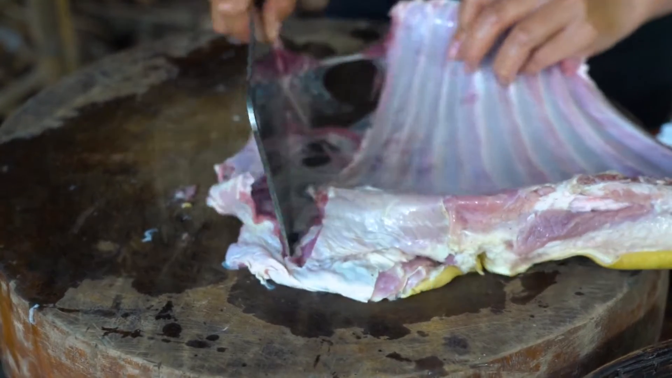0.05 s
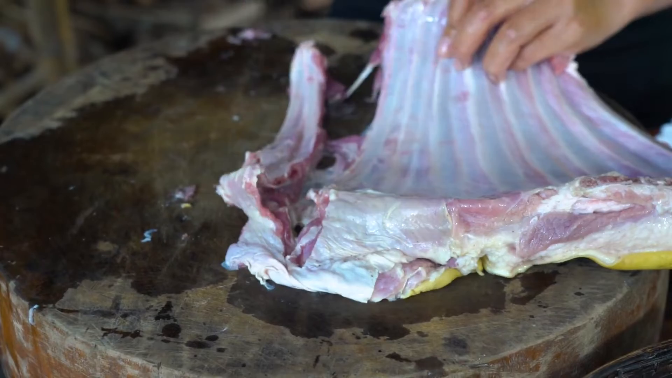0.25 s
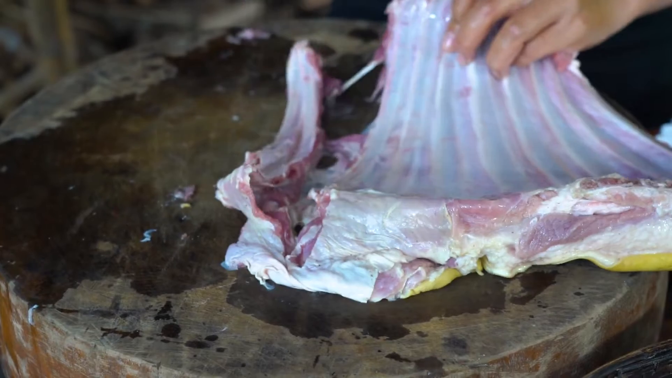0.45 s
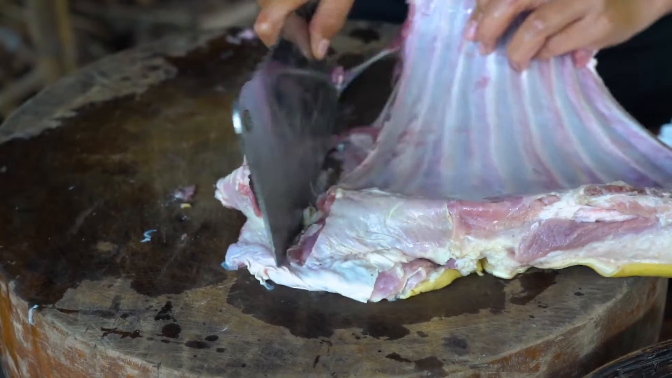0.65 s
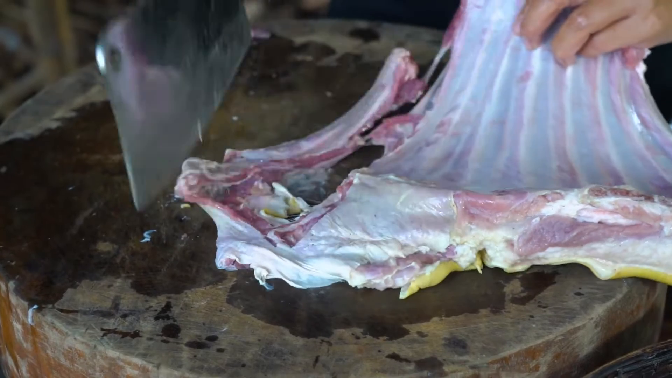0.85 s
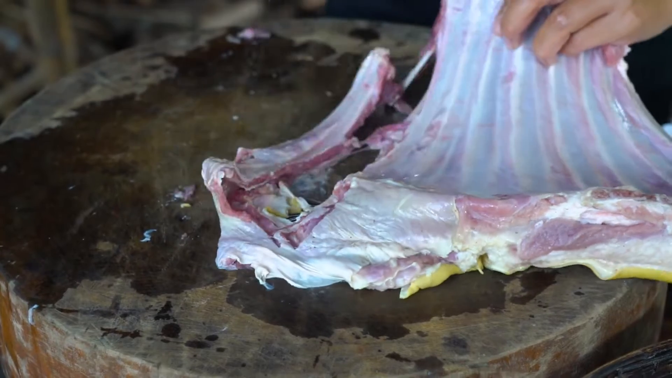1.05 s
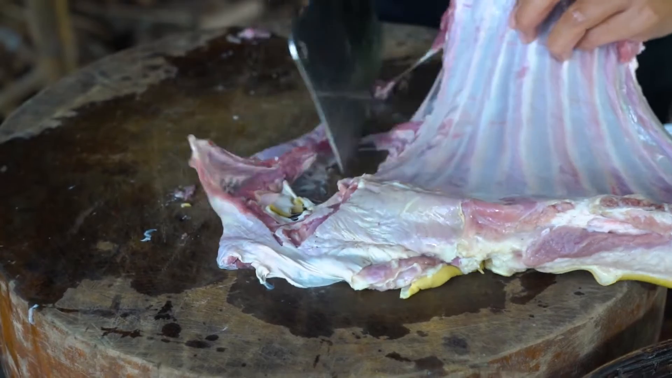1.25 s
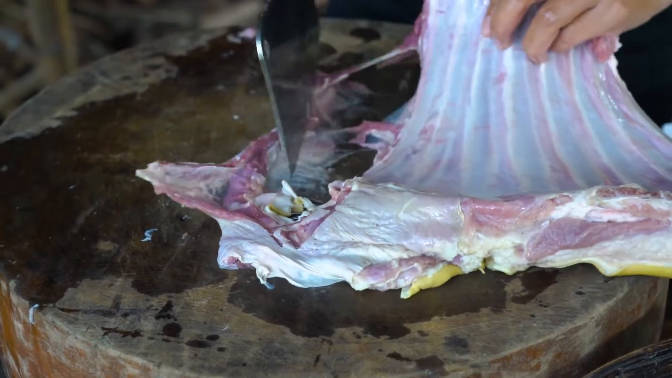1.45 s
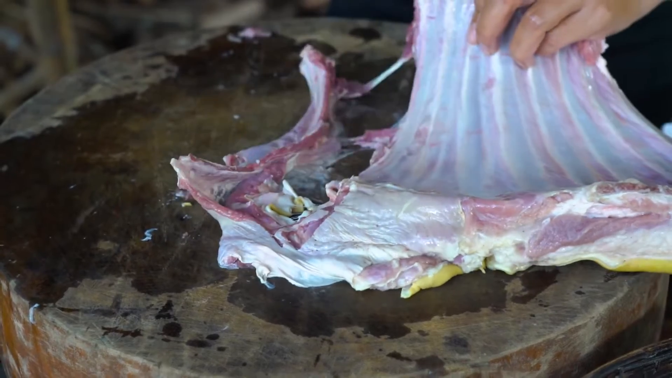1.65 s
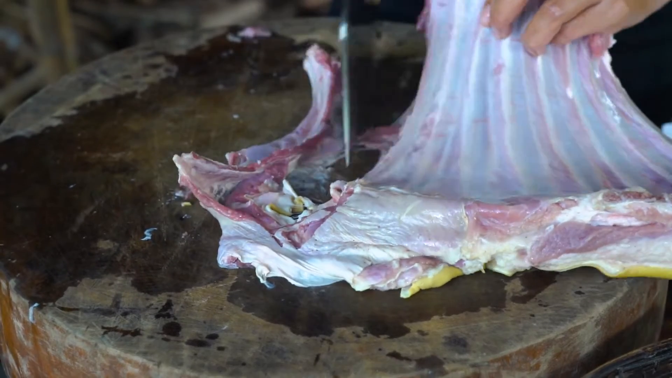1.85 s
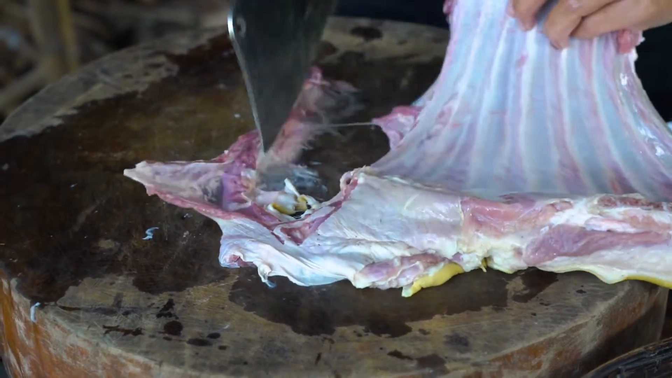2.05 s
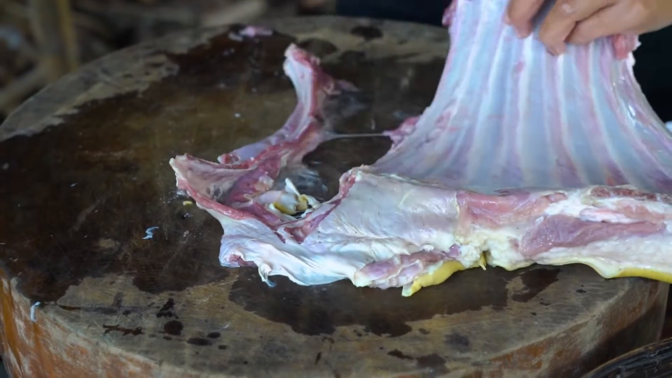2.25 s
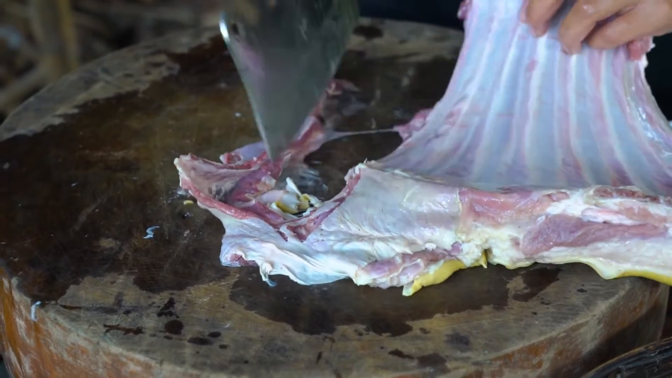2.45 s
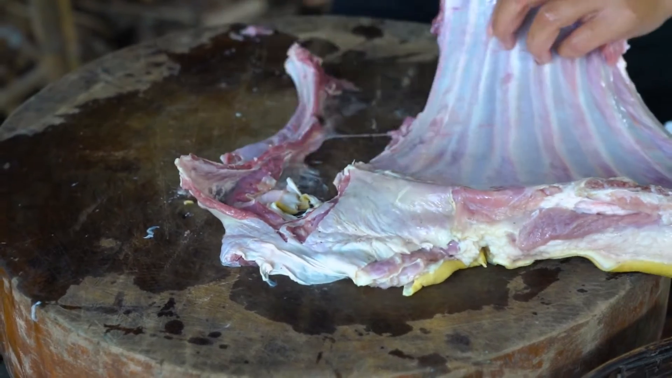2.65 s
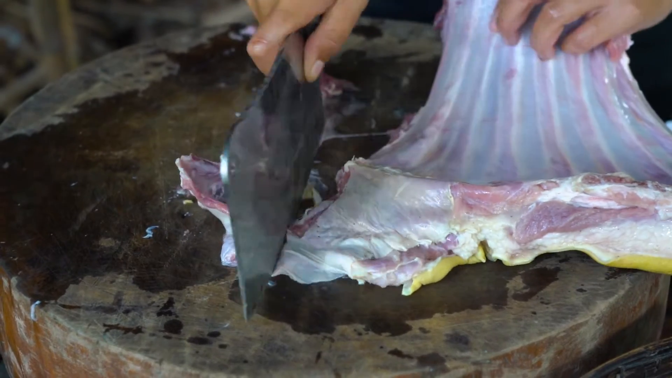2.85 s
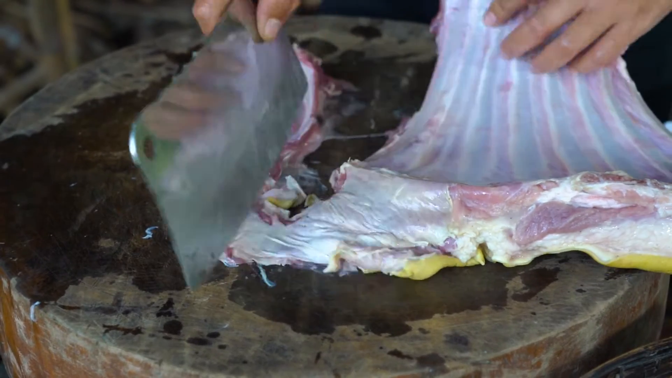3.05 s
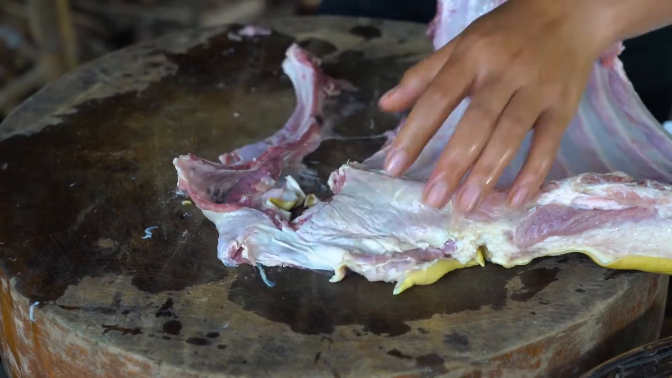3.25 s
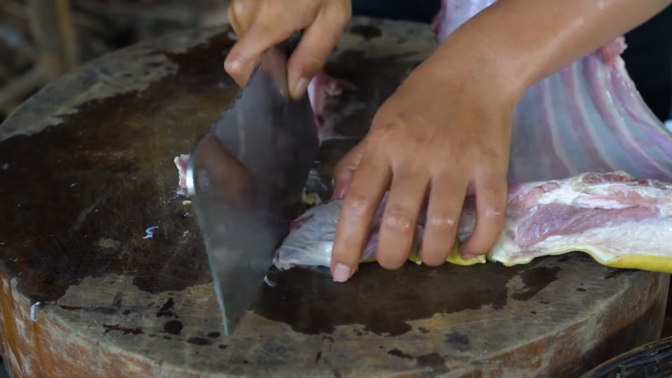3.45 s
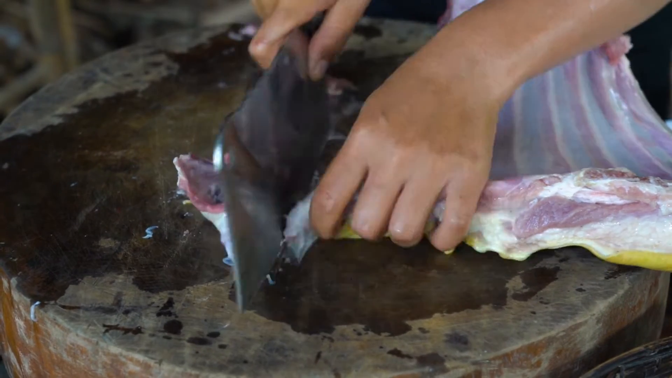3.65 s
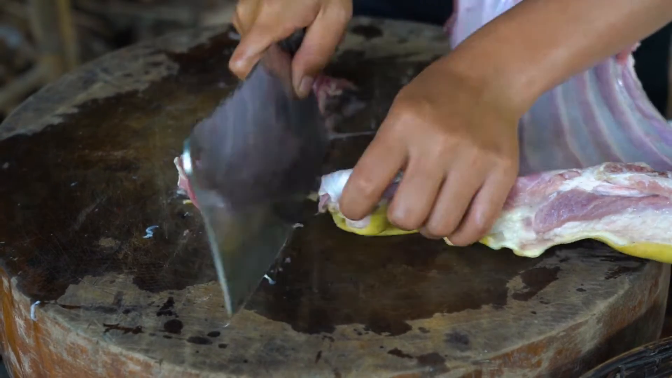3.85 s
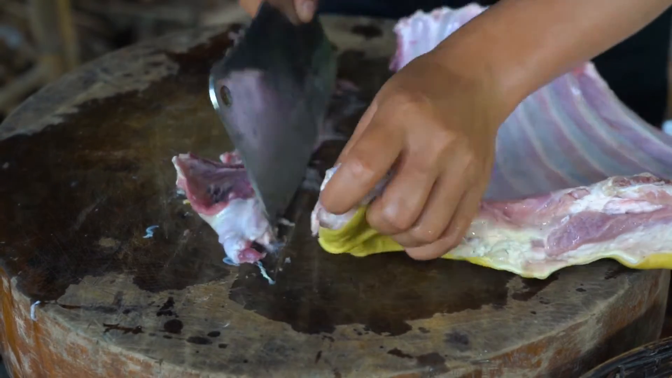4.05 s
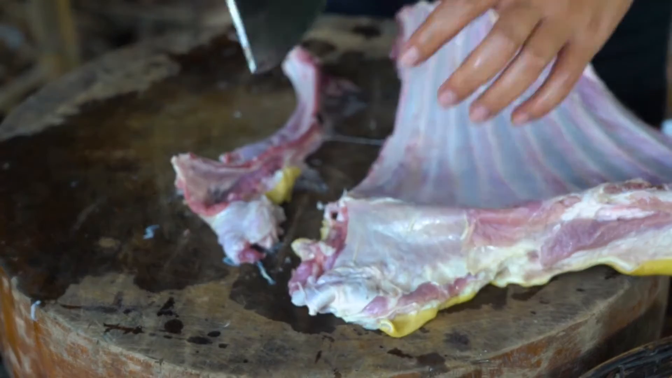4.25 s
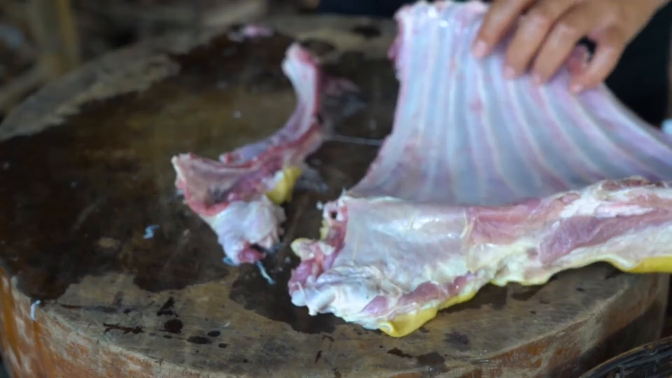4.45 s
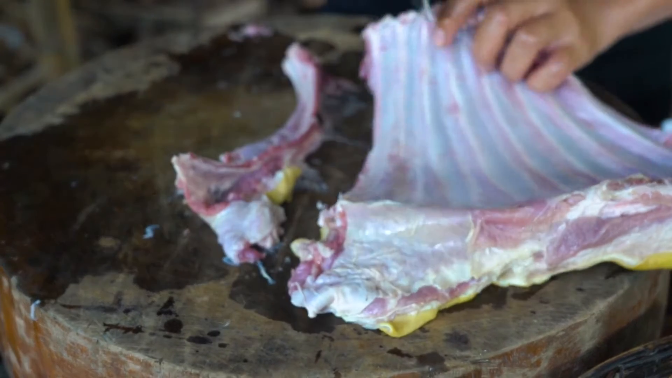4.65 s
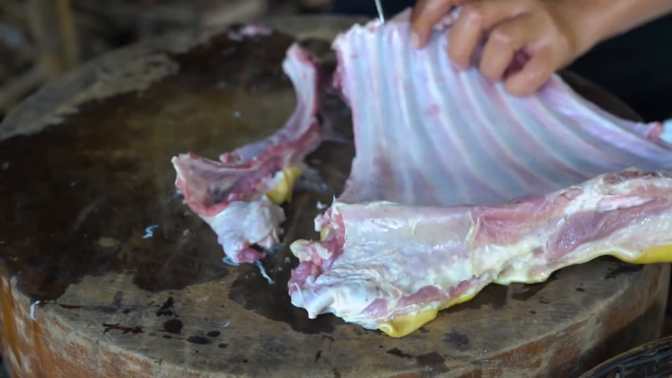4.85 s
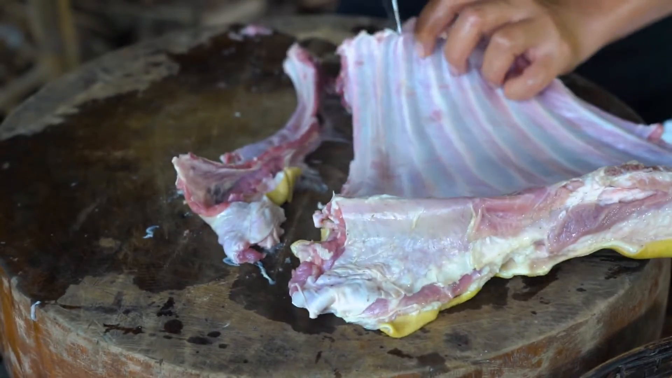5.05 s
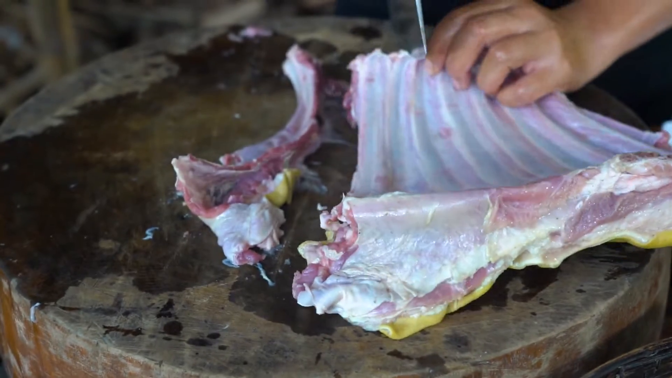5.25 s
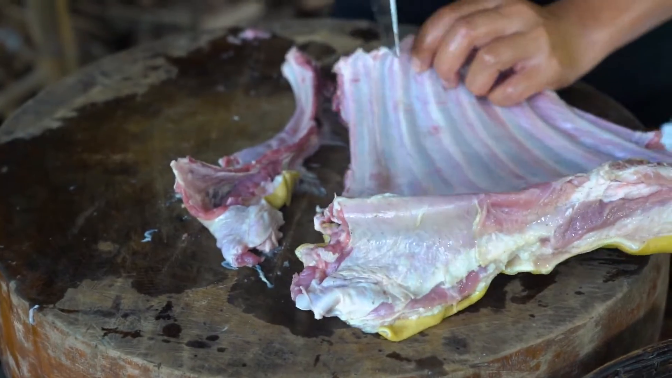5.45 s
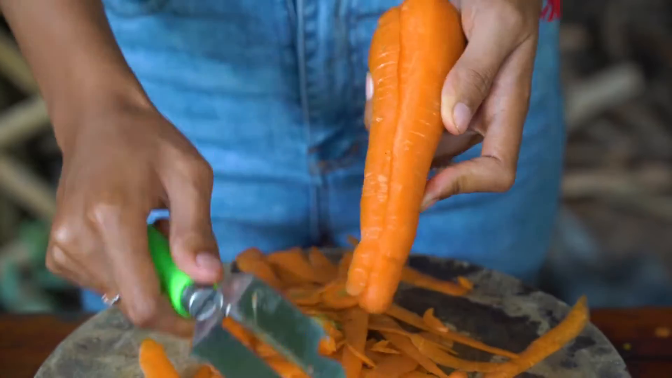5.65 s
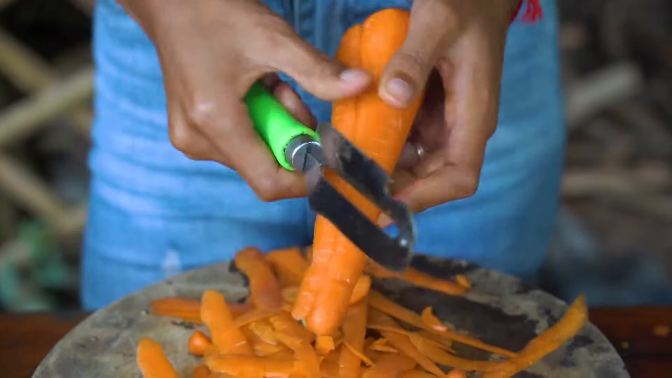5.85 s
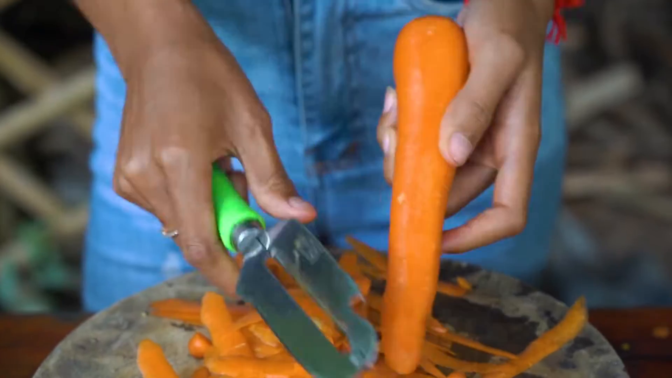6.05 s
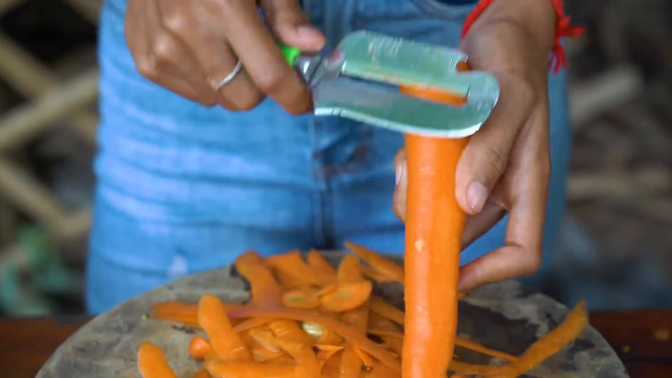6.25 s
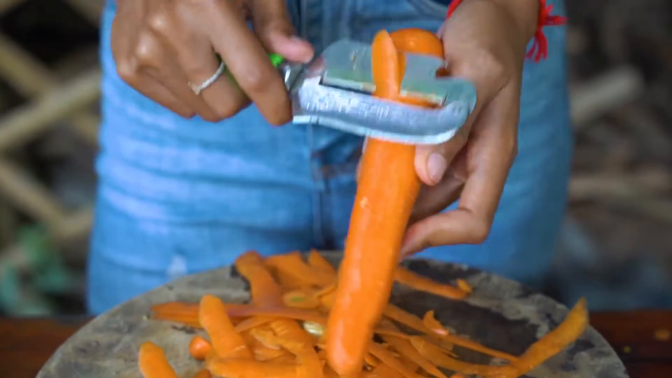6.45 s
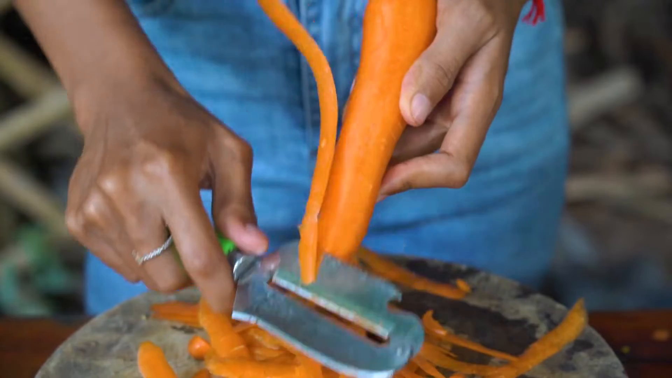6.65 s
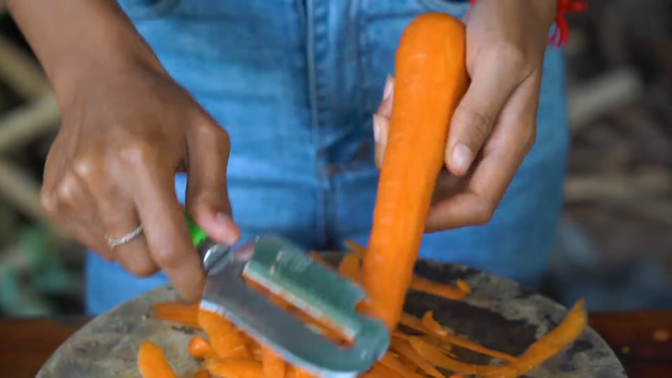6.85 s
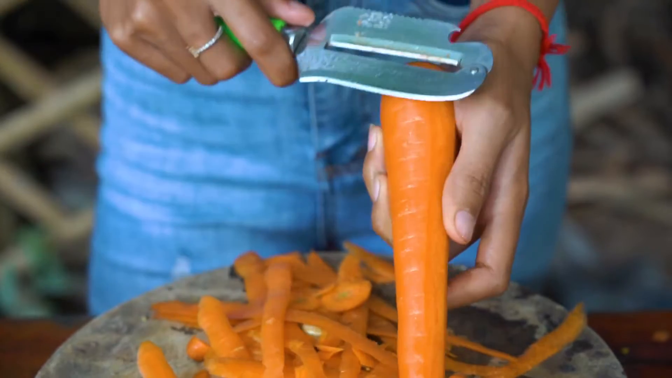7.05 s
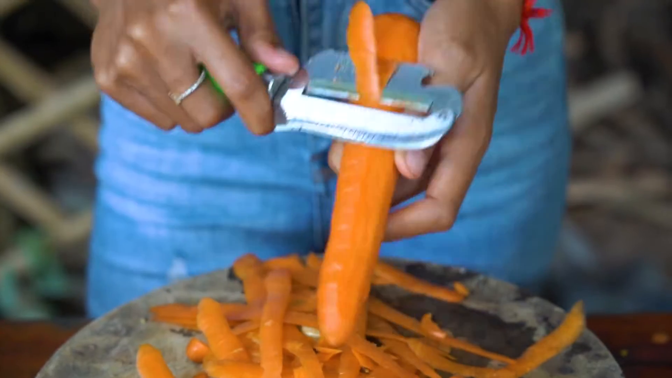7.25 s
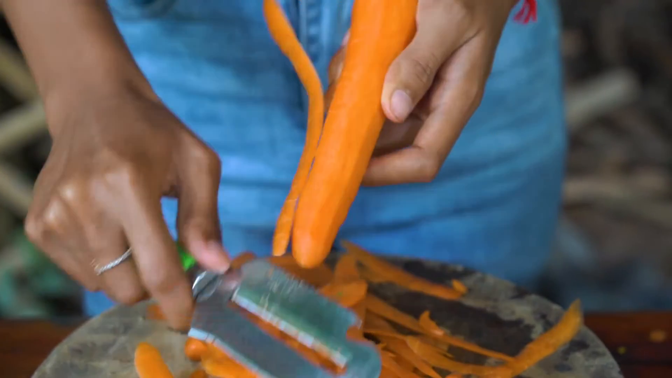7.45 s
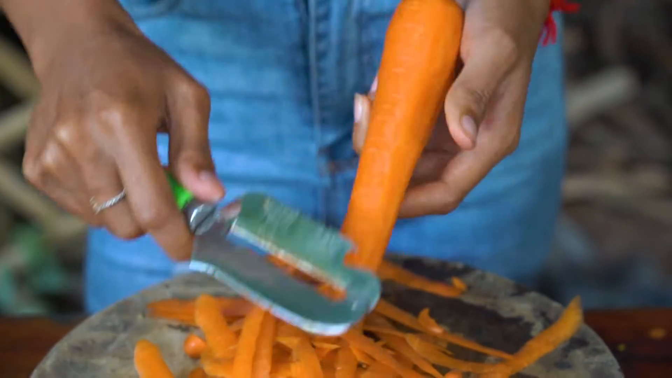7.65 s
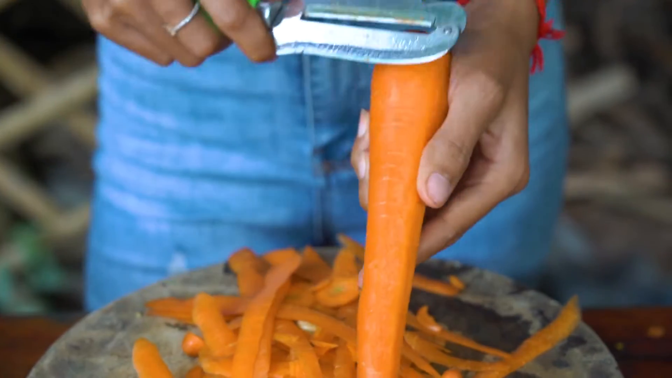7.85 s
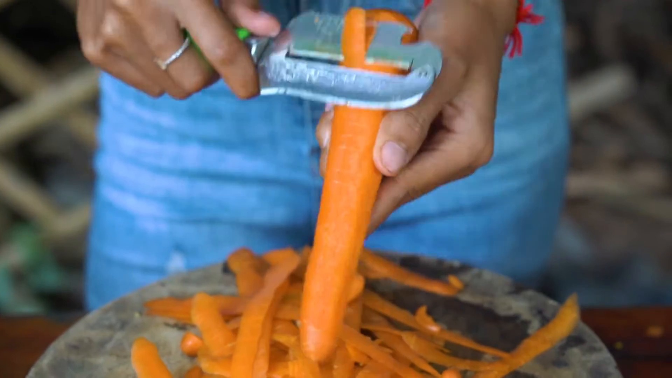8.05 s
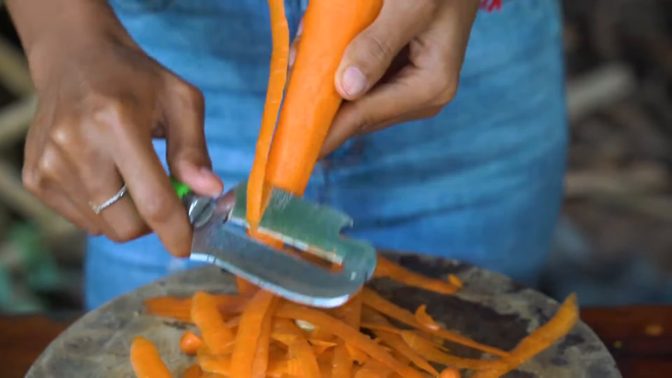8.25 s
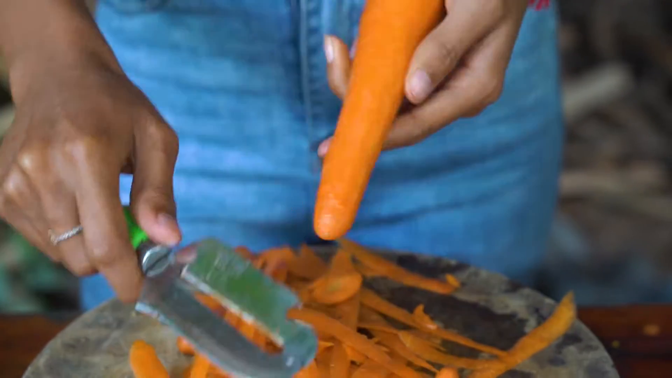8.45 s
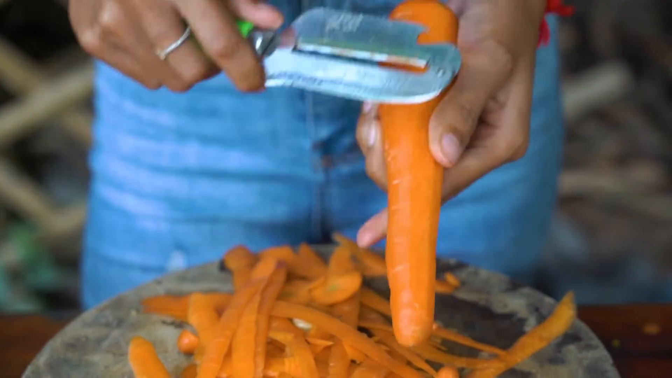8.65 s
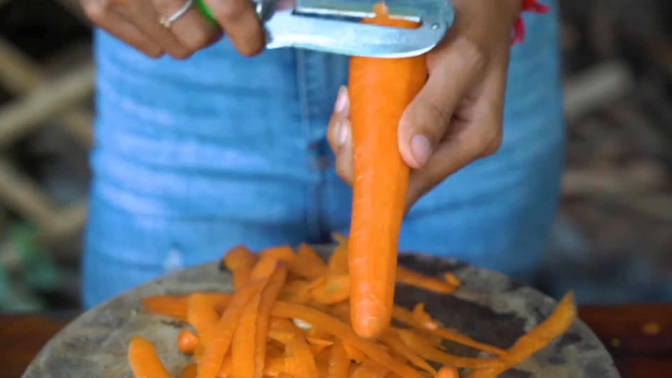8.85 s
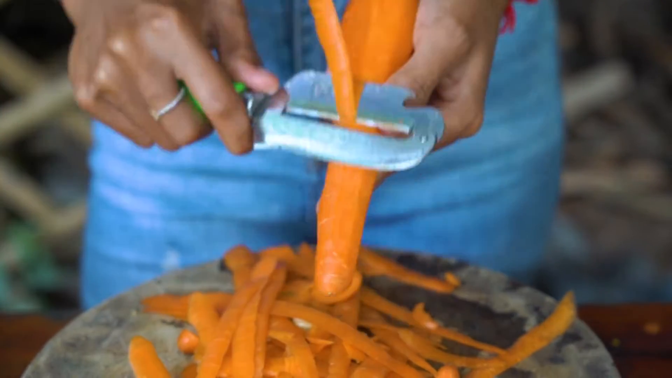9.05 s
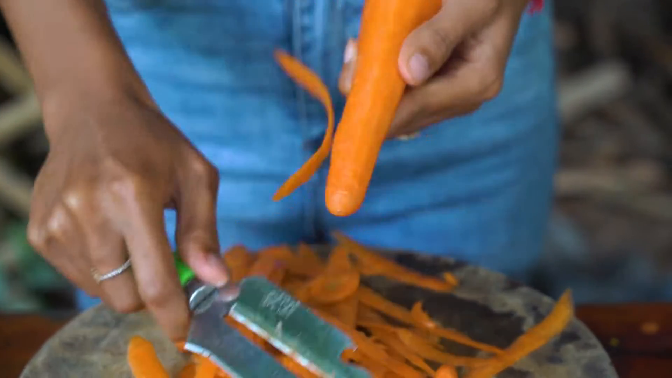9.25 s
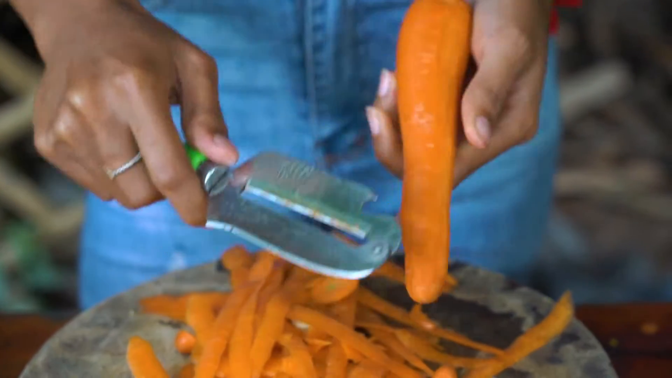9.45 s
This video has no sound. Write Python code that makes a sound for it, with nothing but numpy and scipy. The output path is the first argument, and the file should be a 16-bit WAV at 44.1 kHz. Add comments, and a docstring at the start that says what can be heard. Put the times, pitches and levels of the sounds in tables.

```python
"""Faint outdoor air and hiss lie under everything; from the start meat is dragged over wood in sticky noise.
A heavy cleaver then chops ribs on a thick block in a yard: crackling noise for bone and wood, decaying
sines for block and steel, low sines for its heave, delayed noise for the walls. Taps and thuds fall between.
Thin chirps, then distant calls, are wavering sines. From 5.64 s the direction changes; dull rumbles come in,
then a peeler scrapes in bright noise between the last chops."""
import sys
import numpy as np
from scipy import signal
from scipy.fft import rfft, irfft
from scipy.io import wavfile
from scipy.ndimage import uniform_filter1d, minimum_filter1d

SR = 44100
rng = np.random.default_rng(int(sys.argv[2]) if len(sys.argv) > 2 else 0)


def to_wav(sig):
    """Store sig (one row per channel, or 1-D mono) as 16-bit WAV at the path in sys.argv[1].

    Samples outside -1..1 are clipped; the rate is SR.
    """
    pcm = np.clip(np.atleast_2d(sig), -1, 1) * 32767
    pcm = np.round(pcm).astype(np.int16)
    wavfile.write(sys.argv[1], SR, pcm.T)  # frames by channels


N = 418950
TIME = np.arange(N) / SR  # seconds through the scene
AGE = np.arange(20480) / SR  # seconds since the start of one event

# Direction: left lead in seconds, treble left minus right in dB for near sound, the same for far sound
FIRST_SPOT, SECOND_SPOT = (0.00009, -5.5, 0.43), (-0.00011, -7, -7)
MOVE_S = 5.64  # events from here on use the second spot


def undb(db):
    """Decibels to gain."""
    return 10 ** (np.asarray(db) / 20)


def unit(x):
    """Scale to rms 1."""
    return x / np.sqrt(np.mean(x ** 2))


def fade(t60, delay=0):
    """Exponential decay by 60 dB in t60 seconds, silent until the delay is over."""
    return (AGE >= delay) * np.exp(-np.log(1000) * np.maximum(AGE - delay, 0) / t60)


def swell(length, edge=0.019):
    """A gate of the given length in seconds with straight ramps at both edges."""
    return np.clip(np.minimum(AGE, length - AGE) / edge, 0, 1)


def wander(size, rate):
    """Smooth chance of spread near 1: random knots, rate of them per SR points, joined by lines."""
    knots = rng.standard_normal(4096)
    return 1.11 * np.interp(np.arange(size) / SR * rate, np.arange(len(knots)), knots)


def freqs(x):
    """Frequencies of the bins of x in Hz, kept off zero."""
    return np.maximum(np.fft.rfftfreq(x.shape[-1], 1 / SR), 1)


def grains(spread_db=0, channels=3, size=len(AGE)):
    """Noise, the more crackly the wider its sizes spread; with 3 rows, one is shared and one is for each ear."""
    sizes = rng.standard_normal((channels, size // 32 + 1))
    sizes = np.repeat(sizes, 32, axis=1)[:, :size]  # each grain lasts 32 samples
    return rng.standard_normal((channels, size)) * undb(spread_db * sizes)


def colour(x, points, tilt_db=0):
    """Shape the spectrum of x along the points, tilted in dB per octave; rms 1."""
    hz, db = np.transpose(points)
    octave = np.log2(freqs(x))
    shape_db = np.interp(octave, np.log2(hz), db) + tilt_db * octave
    return unit(irfft(rfft(x) * undb(shape_db), x.shape[-1]))


def band(x, hz, width):
    """A steep resonance around hz, a little narrower than width says; rms 1."""
    f = freqs(x)
    detune = (f - hz ** 2 / f) / (0.98 * width)
    return unit(irfft(rfft(x) / (1 + detune ** 2), x.shape[-1]))


def comb(x, depth_db, rate):
    """Many short paths interfere: random peaks and dips along the spectrum, denser at a higher rate; rms 1."""
    z = rfft(x)
    return unit(irfft(z * undb(depth_db * wander(z.shape[-1], rate)), x.shape[-1]))


def ring(modes, pitch=1, scatter=0.022):
    """Struck modes as decaying sines; each blow lands on another spot and weights and tunes them anew."""
    total = 0
    for hz, db, t60 in modes:
        level_chance, pitch_chance = rng.standard_normal(2)
        mode_hz = hz * pitch * (1 + scatter * pitch_chance)
        total = total + undb(db + level_chance) * fade(t60) * np.sin(2 * np.pi * mode_hz * AGE)
    return np.sqrt(2) * total


def place(x, s, diffuse=0.0, far=False, shadow_hz=1400, blur_hz=800, bass_share=0.045):
    """Two microphone ports: a time lag, treble shadowed on one side and less alike than the bass."""
    lead, near_db, far_db = FIRST_SPOT if s < MOVE_S else SECOND_SPOT
    z, f = rfft(x), freqs(x)
    if x.ndim == 2:
        treble = f ** 2 / (f ** 2 + blur_hz ** 2)
        own = np.clip(diffuse * (bass_share + (1 - bass_share) * treble), 0, 1)
        z = z[0] * np.sqrt(1 - own) + z[1:] * np.sqrt(own)
    pan_db = (far_db if far else near_db) * f ** 2 / (f ** 2 + shadow_hz ** 2)
    pan_db = pan_db + 0.93 / (1 + (f / 350) ** 2)  # the bass leans slightly left
    side = np.array([[0.5], [-0.5]])
    return irfft(z * undb(side * pan_db) * np.exp(2j * np.pi * f * lead * side), x.shape[-1])


def add(out, s, x):
    """Mix x in at time s, its last 900 samples faded out."""
    i = int(s * SR)
    x = x * np.minimum(np.arange(x.shape[-1])[::-1] / 900, 1)
    out[:, i:i + x.shape[-1]] += x[..., :N - i]


def background():
    """Gently stirring outdoor air, as coloured noise, with a few narrow bands of steady hiss."""
    # Colour of the air. Each row: frequency in Hz, density in dB per Hz
    air_colour = [(25, -13), (50, 6), (110, 0.5), (200, -7.5), (400, -12.5), (750, -13), (1500, -16),
                  (3000, -17.5), (4000, -19.5), (6300, -18.5), (9000, -21.5), (13000, -27), (16000, -18)]
    # Hiss bands. Each row: centre in Hz, nominal width in Hz, level at the start in dB
    hiss_bands = [(3435, 200, -67.5), (4740, 690, -58.5), (11180, 1100, -59.5)]
    # Level of the air; the hiss follows its changes. Each row: time in seconds, level in dB
    air_level = [(0, -48.5), (1.999, -49.5), (4, -51.5), (5.6, -48), (6.5, -49), (7.7, -54), (8.9, -55.5),
                 (9.5, -56)]
    air = place(colour(grains(size=N), air_colour), 0, diffuse=0.92, far=True)
    air = air * undb(0.9 * wander(N, 19))
    hiss = sum(undb(db) * band(grains(channels=2, size=N), hz, width) for hz, width, db in hiss_bands)
    s, db = np.transpose(air_level)
    return (air * undb(db[0]) + hiss) * undb(np.interp(TIME, s, db) - db[0])


def note(length, start_hz, glide, rough):
    """An arched note that wavers in pitch and level on its way: (phase, envelope)."""
    u = np.clip(AGE / length, 0, 1)
    waver = rough * wander(len(AGE), start_hz / 6)
    hz = start_hz * (1 + glide * u) * (1 + 0.0179 * np.sin(np.pi * u) + waver)
    flutter = undb(3.5 * wander(len(AGE), 55))
    return 2 * np.pi * np.cumsum(hz) / SR, flutter * swell(length, edge=0.016)


def chirps(out):
    """Hoarse high chirps: one sine each, its pitch roughened, falling and trailing off."""
    # Each row: start in seconds, length in seconds, level in dB
    chirp_rows = [(1.356, .16, -54), (2.502, 0.21, -50), (4.258, 0.16, -49)]
    for s, length, db in chirp_rows:
        phase, envelope = note(length, start_hz=6170, glide=-0.08, rough=0.074)
        add(out, s, undb(db) * envelope * fade(1) * np.sin(phase))


def far_calls(out):
    """Distant animal calls: a gliding fundamental with three overtones."""
    # Each row: start in seconds, length in seconds, start pitch in Hz, glide as a share of the pitch,
    # level in dB, first overtone in dB relative to the fundamental
    call_rows = [(3.99, 0.16, 1192, -.05, -58.5, 1.5), (4.13, 0.14, 1020, -0.15, -54, -16),
                 (4.28, 0.095, 880, .12, -56.5, -15), (4.379, 0.051, 900, .13, -53, -21),
                 (4.509, 0.12, 1080, -0.054, -53.5, -26), (5.15, .05, 963, 0.12, -53.5, -21),
                 (5.194, 0.2, 1265, -.13, -61, -14), (5.4, 0.06, 1040, 0.074, -55, -15),
                 (5.53, 0.093, 1200, -0.103, -54, -4), (7.43, .14, 1153, -.07, -62, -16),
                 (7.66, 0.13, 1113, -0.054, -60, -16), (8.36, 0.22, 830, -.07, -61.5, -8.5),
                 (8.87, 0.165, 2400, -0.035, -62, -19), (9.024, 0.34, 752, -0.07, -64.5, -9.5)]
    overtone_step_db = -1.5  # from each overtone to the next
    for s, length, hz, glide, db, overtone_db in call_rows:
        phase, envelope = note(length, hz, glide, rough=0.025)
        overtones = sum(undb(overtone_db + overtone_step_db * k) * np.sin((k + 2) * phase) for k in range(3))
        add(out, s, undb(db) * envelope * (np.sin(phase) + overtones))


def rumbles(out):
    """Dull rumbles of handling: low noise that lurches unevenly."""
    # Each row: start in seconds, end in seconds, level in dB
    rumble_rows = [(5.657, 5.773, -36.5), (5.85, 6.16, -39), (6.831, 7.08, -44), (9.138, 9.288, -49)]
    # Colour of the rumble. Each row: frequency in Hz, density in dB per Hz
    rumble_colour = [(20, -17), (50, 8), (90, 5), (170, -12), (300, -20), (800, -54)]
    for s, end, db in rumble_rows:
        lurch = undb(3 * wander(len(AGE), 25))
        rumble = colour(grains(), rumble_colour) * lurch * swell(end - s, edge=0.029)
        add(out, s, undb(db) * place(rumble, s, diffuse=0.795))


def peeler(out):
    """Peeler strokes: bright grainy scraping under wavering pressure."""
    # Each row: start in seconds, end in seconds, level in dB
    stroke_rows = [(6.548, 6.828, -50), (7.352, 7.575, -47.5), (8.151, 8.429, -51), (9.045, 9.335, -49)]
    # Colour of the scrape. Each row: frequency in Hz, density in dB per Hz
    peel_colour = [(1000, -19.5), (3000, -3.5), (6000, 1), (8000, 1), (11000, 0), (14000, -0.5),
                   (16000, -7)]
    for s, end, db in stroke_rows:
        pressure = undb(1.3 * wander(len(AGE), 53.5)) * swell(end - s, edge=0.063)
        scrape = colour(grains(spread_db=3), peel_colour) * pressure
        add(out, s, undb(db) * place(scrape, s, diffuse=0.91, far=True))


def dragged_meat(out):
    """Meat dragged over the wood: crackly noise that sticks and lets go."""
    # Each row: start in seconds, length in seconds, level in dB
    drag_rows = [(0, 0.076, -48.5), (0.497, 0.11, -51.5), (1.53, 0.45, -51), (3.203, 0.065, -45.5),
                 (3.764, 0.15, -42), (3.99, 0.39, -45.5), (4.393, 0.37, -52), (4.775, 0.174, -47),
                 (5.321, 0.18, -45.5), (5.491, 0.14, -47)]
    # Colour of meat on wood. Each row: frequency in Hz, density in dB per Hz
    flesh_colour = [(100, -2), (500, -0.5), (1100, 5), (1900, -2), (2600, -3.5), (5000, -6.5),
                    (16000, -18.5)]
    for s, length, db in drag_rows:
        sticking = undb(3 * wander(len(AGE), 80))
        pull = swell(length, edge=0.02) * fade(1.46) * sticking
        friction = comb(colour(grains(spread_db=4.5), flesh_colour), depth_db=1.5, rate=400)
        add(out, s, undb(db) * place(friction * pull, s, diffuse=0.8))


def taps(out):
    """Taps of blade, bone and stand: a broad resonance of crackly noise, soft as meat pads the contact."""
    # Each row: time in seconds, level in dB, centre in Hz
    tap_rows = [(0.713, -18, 2000), (.751, -21, 1050), (0.806, -41, 1520), (.875, -27, 865),
                (.975, -33.5, 850), (1.613, -40.5, 1150), (2.058, -17, 1080), (2.095, -18.5, 900),
                (3.031, -22, 1210), (3.169, -29.5, 1160), (3.276, -40.5, 940), (3.647, -18.5, 1530),
                (3.785, -36.5, 1930), (3.941, -38.5, 620), (4.043, -40, 910), (4.331, -39, 880),
                (4.452, -40.5, 950), (4.731, -43.5, 1390), (5.267, -45, 950), (5.48, -43.5, 775),
                (5.8, -23, 1600), (5.889, -24.5, 1028), (6.408, -14.5, 900), (6.492, -22, 2350),
                (6.679, -38, 1470), (7.153, -15, 850), (8.863, -44.5, 5000)]
    for s, db, hz in tap_rows:
        tap = band(grains(spread_db=4.5), hz, 1.2 * hz) * fade(0.1) * (1 - fade(0.0099))
        add(out, s, undb(db) * place(tap, s, diffuse=0.63, far=True))


def heave(s, db, hz, t60):
    """The heavy block rocks on its stand in three modes and sways a little sideways."""
    phase = 2 * np.pi * hz * AGE
    rock = np.sin(phase) + undb(-4) * np.sin(0.77 * phase) + undb(-4.5) * np.sin(1.3 * phase)
    sway = undb(-16.5) * np.sin(phase) * np.array([[1], [-1]])  # opposite in the two ears
    push = undb(db) * fade(t60) * (1 - fade(0.031))
    return place(rock * push, s) + sway * push


def thuds(out):
    """The block drops back on its stand after a chop, or is bumped, and rocks."""
    # Each row: time in seconds, level in dB, main rocking mode in Hz
    thud_rows = [(0.709, -11.5, 135.5), (2.999, -13, 134), (3.61, -14, 112), (3.939, -28.5, 159.4),
                 (3.985, -30.5, 150), (5.016, -38, 131), (5.651, -29.5, 109), (5.76, -22, 138),
                 (6.442, -6, 132), (7.197, -11, 126)]
    for s, db, hz in thud_rows:
        add(out, s, heave(s, db, hz, t60=0.13))


def crack(s, db, t60, tilt_db):
    """Bone or wood gives way in a burst of tiny fractures that rings the steel and leaves a faint bright tail."""
    # Colour of the fractures before the tilt. Each row: frequency in Hz, density in dB per Hz
    bone_colour = [(300, -19.5), (900, 0.5), (2200, 7.5), (3500, 3.5), (6000, 1.5), (10000, -5),
                   (16000, -15.5)]
    # Ring of the cleaver before chance detunes and weights it. Each row: mode in Hz, level in dB, t60 in seconds
    blade_modes = [(2320, -15, 0.39), (2660, -17.5, 0.18), (4070, -2.5, 0.13), (4430, -9.5, 0.1),
                   (4840, -29.5, 0.053), (5470, -21.5, 0.081), (8850, -26.5, 0.055), (9460, -32, 0.04),
                   (15750, -31.5, 0.075)]
    fractures = comb(colour(grains(spread_db=4.5), bone_colour, tilt_db), depth_db=4.0, rate=990)
    tail = undb(-25) * fade(0.35)
    burst = fractures * (fade(t60) + tail) * (1 - fade(0.0018))
    steel = undb(-21.5) * place(ring(blade_modes, scatter=0.0049), s)
    return undb(db) * (place(burst, s, diffuse=0.54) + steel)


def block_ring(knock_db, body_db, pitch):
    """The block's upper modes knock at once; its deep body swells more slowly, as the meat cushions the push."""
    # Each row: mode in Hz before pitch factor and chance, level in dB before chance, t60 in seconds
    block_modes = [(205.6, -6, 0.19), (337.4, -7.5, 0.37), (470, -11, 0.066), (574.4, 2, 0.063),
                   (724, -9.5, 0.13), (740.7, 0.5, 0.037), (1170, -13, 0.033), (1502, -1.5, 0.025),
                   (1814, -35.5, 0.017)]
    body_top_hz = 640
    knock = ring([m for m in block_modes if m[0] > body_top_hz], pitch) * (1 - fade(0.0056))
    body = ring([m for m in block_modes if m[0] < body_top_hz], scatter=0.031) * (1 - fade(0.068))
    return -undb(knock_db) * knock - undb(body_db) * body


def clatter(s, db, ring_out):
    """Meat and stand clatter after the blow: low-heavy decaying noise."""
    # Each row: frequency in Hz, density in dB per Hz
    clatter_colour = [(30, -26), (60, -7), (130, 6.5), (260, 1), (420, -0.5), (650, -3), (1000, -8),
                      (1600, -13.5), (2500, -21.5), (5000, -34.5), (16000, -67.5)]
    noise = comb(colour(grains(), clatter_colour), depth_db=1.5, rate=1400)
    noise = noise * fade(0.29 * ring_out) * (1 - fade(0.0058))
    return undb(db) * place(noise, s, diffuse=0.46)


def wall_echo(s, db, ring_out):
    """The walls answer: clumpy noise under the summed power of several delayed decays."""
    # Each row: delay in seconds, level in dB relative to the echo, t60 in seconds before the ring-out factor
    wall_rows = [(.004, -9.5, 0.41), (0.047, -1.5, 0.49), (0.09, 1, 0.33), (.14, -6, .25),
                 (0.198, -50, 0.39)]
    # Colour of the yard. Each row: frequency in Hz, density in dB per Hz
    yard_colour = [(40, -5.5), (130, 2), (300, -5), (550, -5.5), (950, 3.5), (1400, -1.4), (2000, -6.5),
                   (2700, -4.5), (4200, -12.5), (8000, -23), (12000, -32), (16000, -35)]
    power = 0
    for delay, wall_db, t60 in wall_rows:
        onset = np.clip((AGE - delay) / 0.0074, 0, 1)
        power = power + (undb(wall_db) * fade(t60 * ring_out, delay) * onset) ** 2
    clumps = undb(1.9 * wander(len(AGE), 220))
    noise = comb(colour(grains(spread_db=1.0), yard_colour), depth_db=3.5, rate=1100)
    return undb(db) * place(noise * np.sqrt(power) * clumps, s, diffuse=0.61, far=True)


def chops(out):
    """The edge splits bone, then bites and rings the block; it heaves, meat and stand clatter, walls answer."""
    # Each row: time the edge meets wood in seconds, force in dB, knock in dB, knock pitch factor, heave in dB,
    # heave in Hz, bite in dB, echo in dB, ring-out factor, lead of the bone split in seconds, bone in dB,
    # bone tilt in dB per octave
    chop_rows = [(0.651, -12.5, -4, 1.036, -21, 128, -34, -23.5, 1.24, 0.00089, -8.5, -1.5),
                 (1.334, -33.5, -27.5, 1.02, -16, 119.4, -14.5, -51, 1.2, 0.0071, -7, 2),
                 (1.970, -15, -14.5, 1.04, -22, 118, -40, -23, 0.95, .0015, -12, -2.5),
                 (2.4725, -20, -11, 1.04, -25.5, 110, -18, -33.5, 0.89, 0.0037, -13, -1),
                 (2.9445, -13, -8, 1.03, -16, 110, -33, -29.5, 0.97, 0.00084, -21, 0),
                 (3.5583, -12, -8.5, 1.06, -8.5, 110, -19, -27.5, 0.99, 0.00093, -9, -3.5),
                 (5.804, -30.5, -26.5, 1.15, -12, 97, -22, -31, 0.97, .0035, -16, -0.5),
                 (6.3975, -9.5, -19, 1.05, -15, 111, -8, -20.5, 1.034, 0.01, -16, -2.5),
                 (7.157, -11, -15, 0.962, -9, 106, -25.5, -23.5, 1.004, 0.007, -20, 4.5),
                 (7.865, -14, -14, 1.08, -9.5, 112, -16, -20, 0.91, 0.0054, -16, -1.5),
                 (8.526, -13, -11.5, 1.05, -11.5, 113.3, -21.5, -26.5, 1.044, 0.0047, -16, 2),
                 (9.303, -12.5, -8, 1.06, -12.5, 111.6, -7.5, -29.5, 1.01, 0.0067, -14.5, -3)]
    crunch_stretch = 3.2  # a thicker bone stops the edge for longer and crunches for longer
    for (s, force_db, knock_db, pitch, heave_db, heave_hz,
         bite_db, echo_db, ring_out, lead, bone_db, tilt_db) in chop_rows:
        add(out, s - lead, crack(s, bone_db, 0.014 + crunch_stretch * lead, tilt_db))
        add(out, s, crack(s, bite_db, 0.018, tilt_db - 1.6))  # wood sounds duller than bone
        add(out, s, place(block_ring(knock_db, force_db - 3.5, pitch), s))
        add(out, s + 0.003, heave(s, heave_db, heave_hz, t60=0.14))
        add(out, s, clatter(s, force_db + 1.2, ring_out))
        add(out, s, wall_echo(s, echo_db, ring_out))


def scene():
    """All sources over the background."""
    out = background()
    for source in (chirps, far_calls, rumbles, peeler, dragged_meat, taps, thuds, chops):
        source(out)
    return out


def record(dry, ceiling=0.64, low_cut_hz=44, top_hz=16000):
    """The microphone sheds the deepest bass, a fast limiter holds the blows down, the top is cut."""
    dry = signal.sosfilt(signal.butter(2, low_cut_hz, "high", fs=SR, output="sos"), dry)
    gain = ceiling / np.maximum(np.abs(dry).max(axis=0), ceiling)
    gain = uniform_filter1d(minimum_filter1d(gain, size=200), size=200)
    return signal.sosfilt(signal.ellip(10, 0.2, 70, top_hz, fs=SR, output="sos"), dry * gain)


dry = scene()
out = record(dry)
to_wav(out)
```